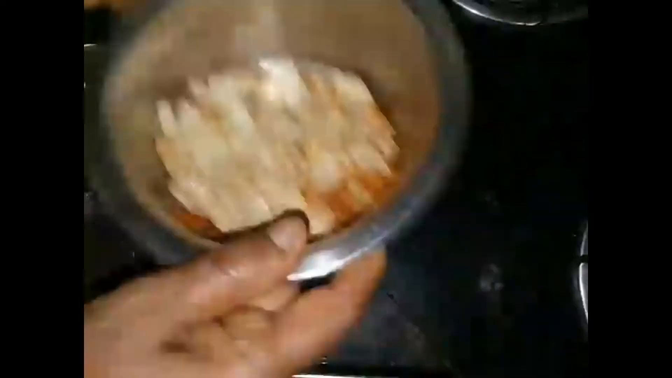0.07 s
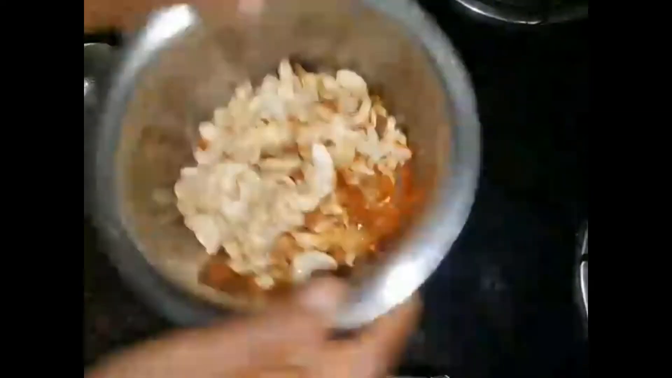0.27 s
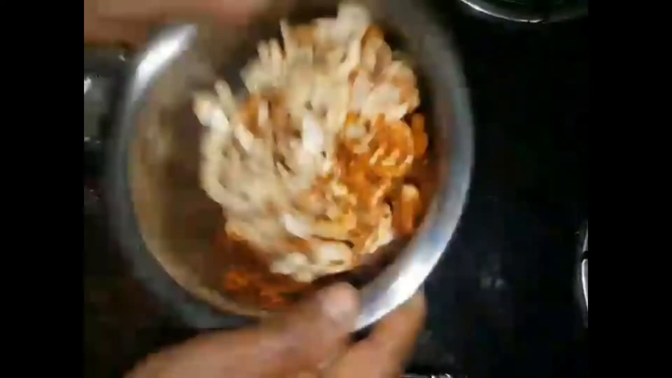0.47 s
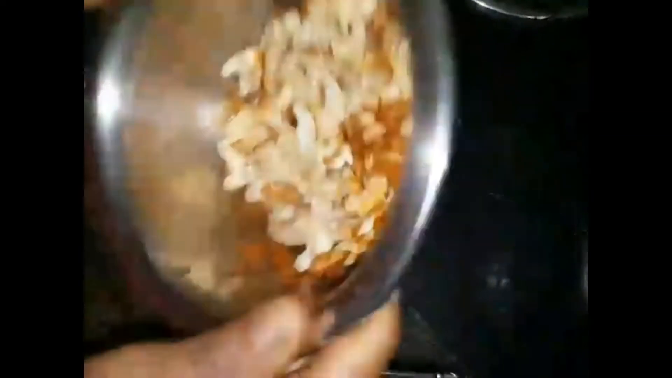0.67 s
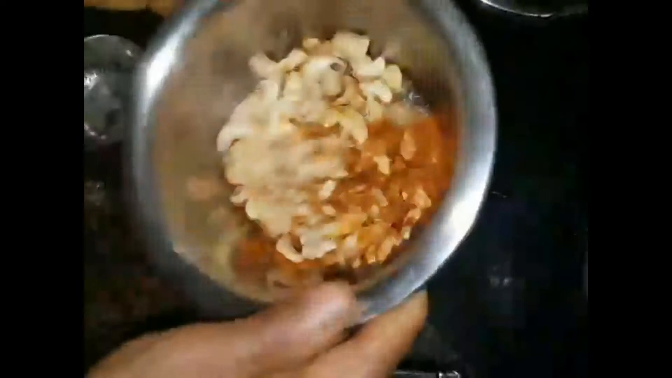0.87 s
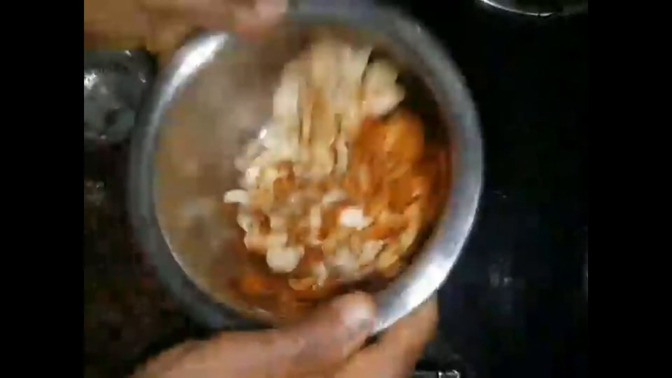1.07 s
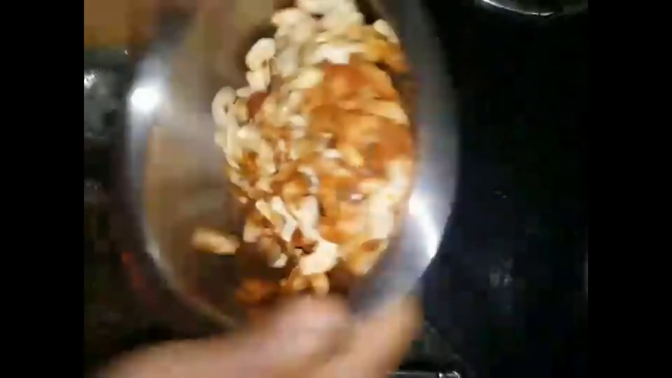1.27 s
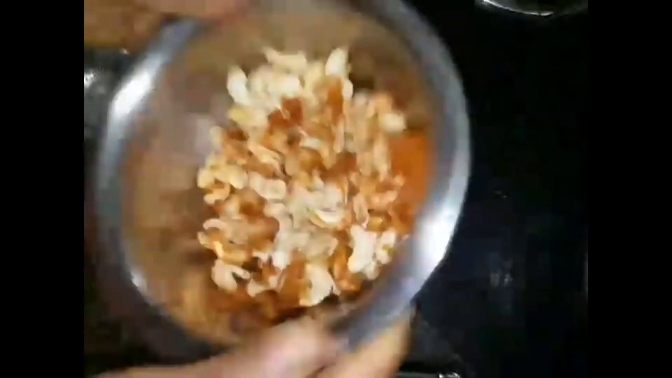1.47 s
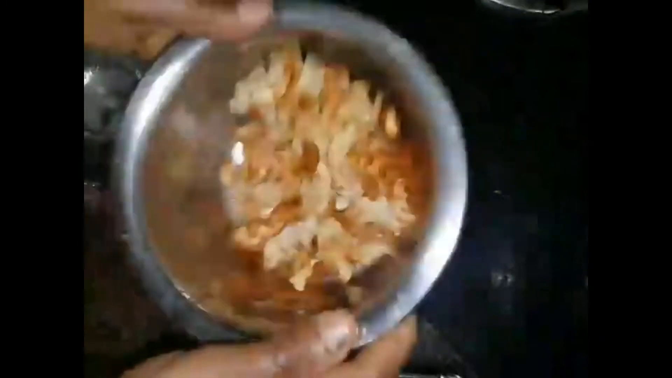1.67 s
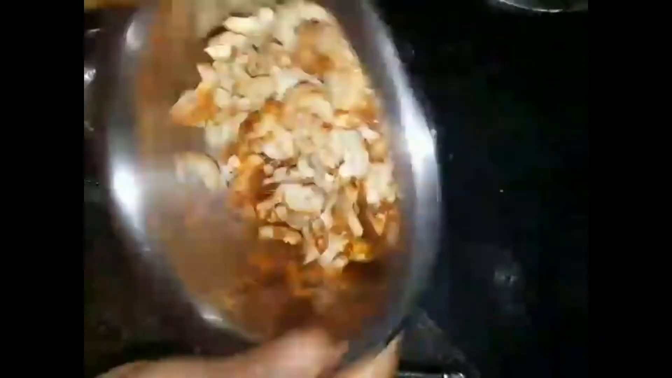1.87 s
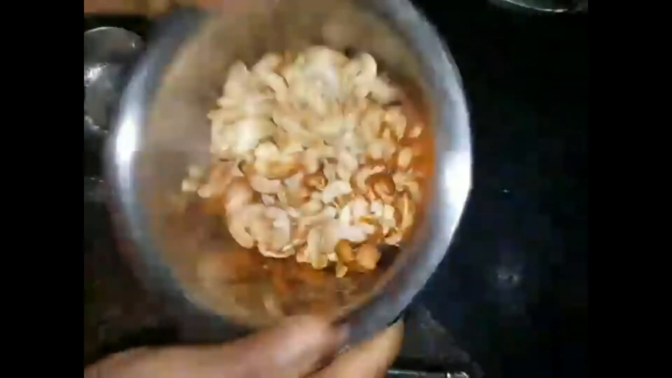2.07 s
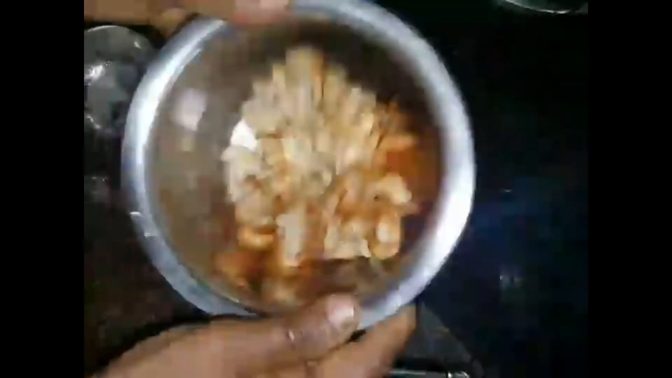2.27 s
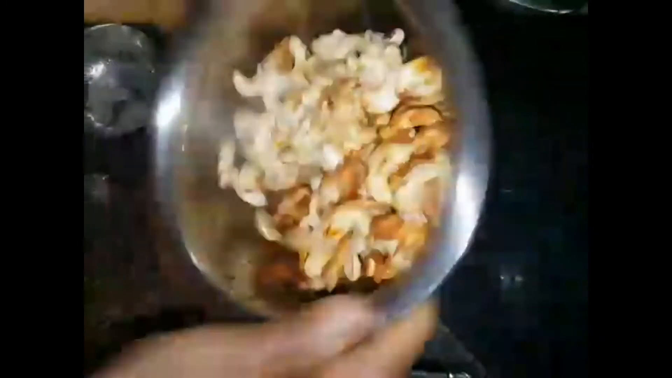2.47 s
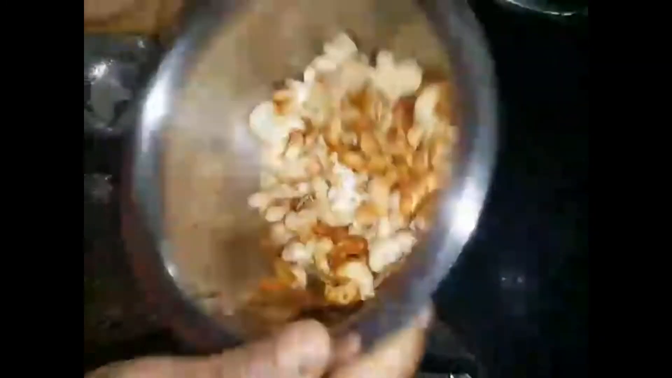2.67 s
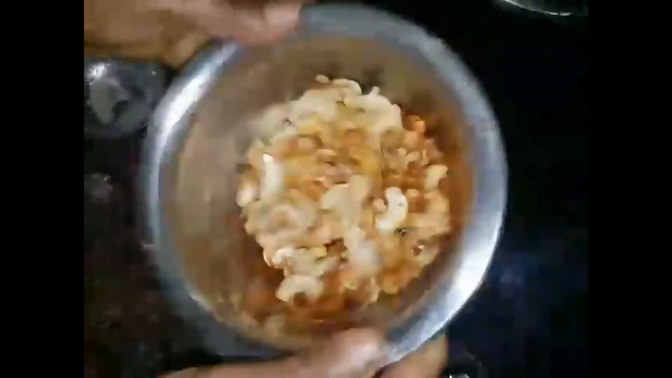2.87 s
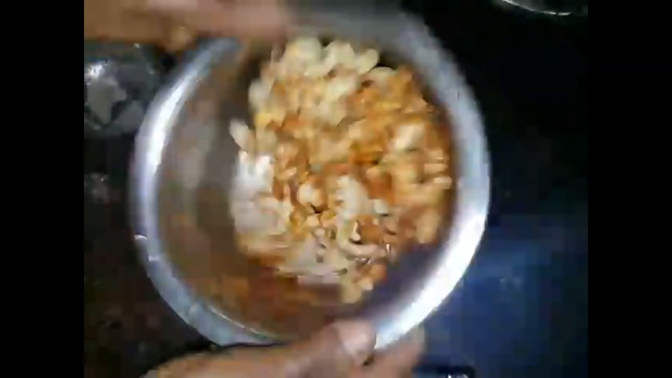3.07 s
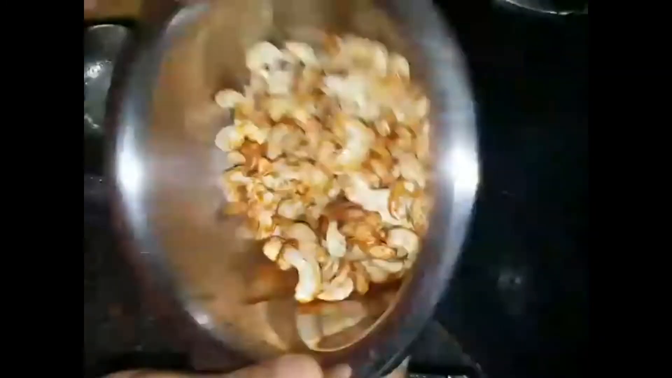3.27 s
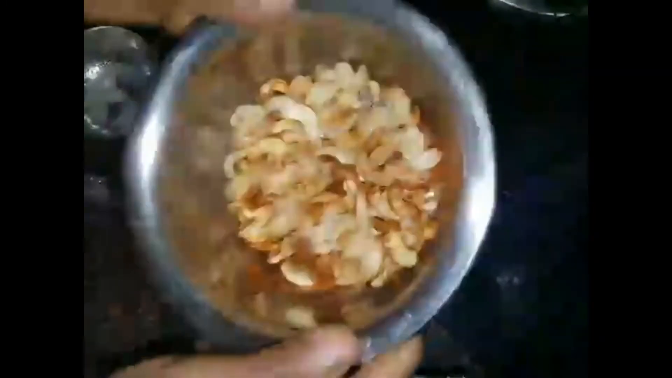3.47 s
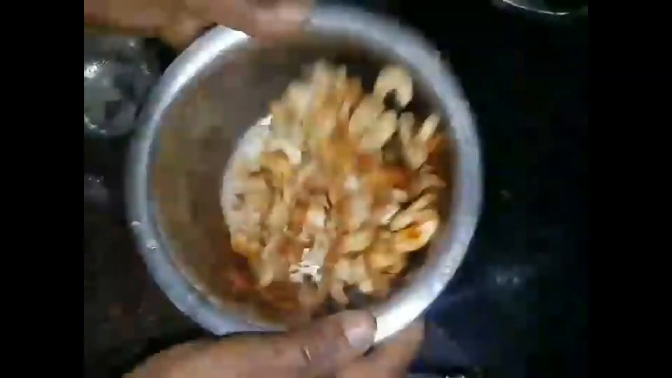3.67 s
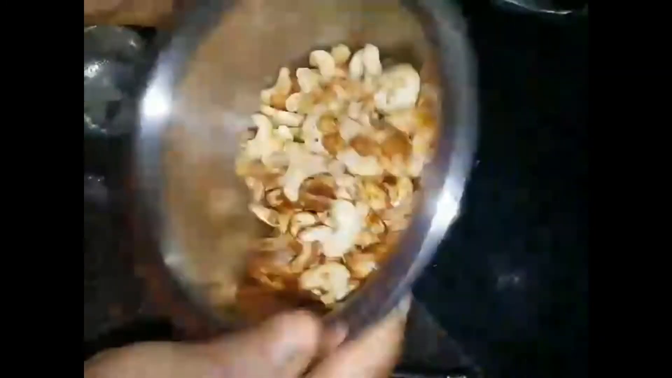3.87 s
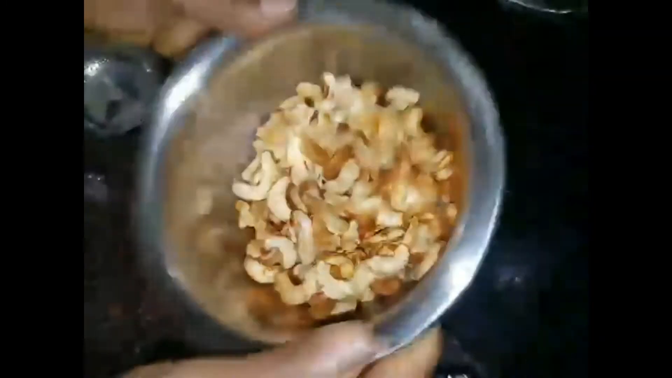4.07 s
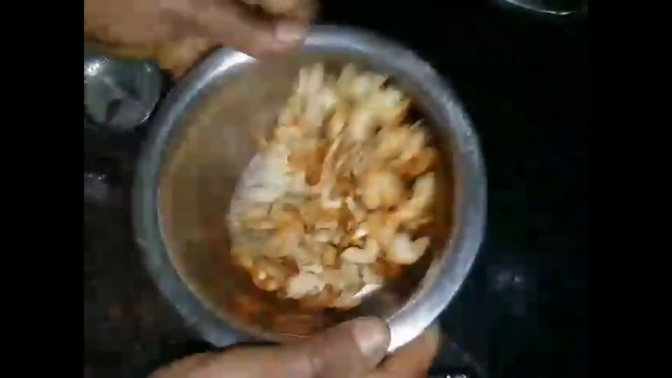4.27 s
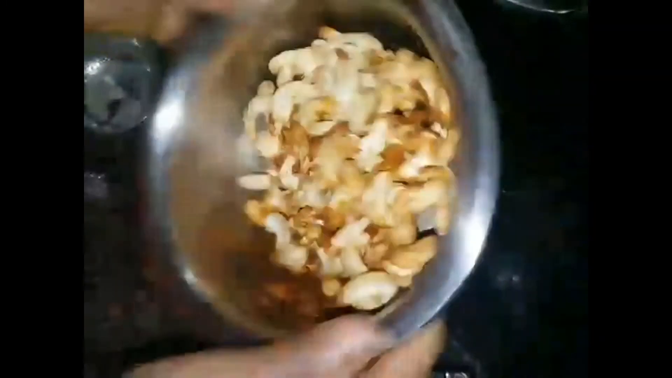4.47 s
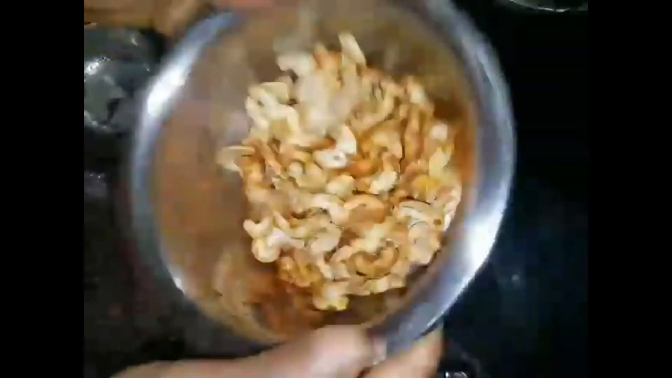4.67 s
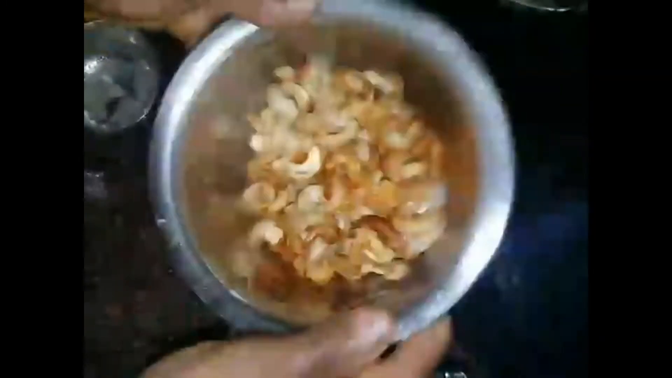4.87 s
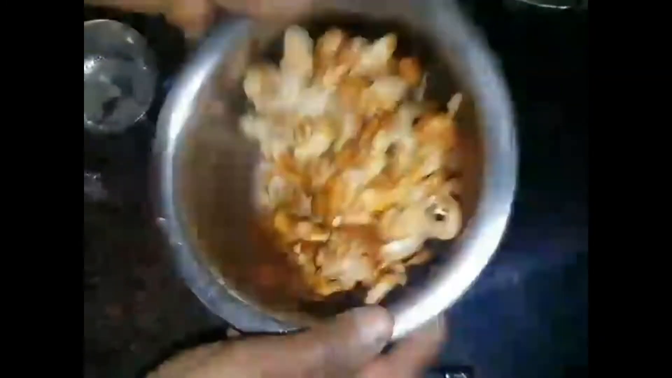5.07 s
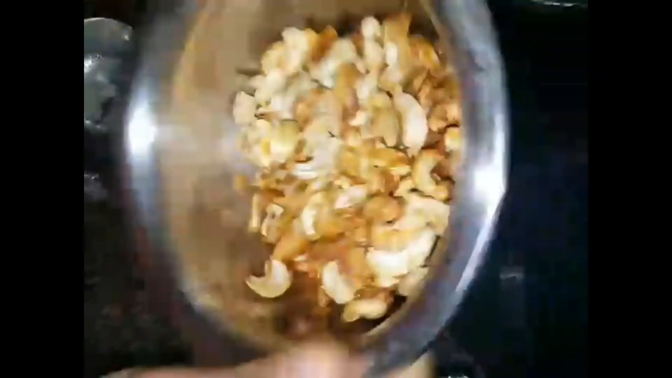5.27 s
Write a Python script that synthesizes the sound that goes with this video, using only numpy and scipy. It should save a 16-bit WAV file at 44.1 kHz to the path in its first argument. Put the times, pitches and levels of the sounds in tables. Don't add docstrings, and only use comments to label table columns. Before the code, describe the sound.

From 0 to 0.5 s the scene is quiet: soft room hush, a faint low fridge hum, light nut rustles near 0.1 and 0.2 s, and thin glass bangle clinks around 0.14 and 0.33 s. At about 0.51 s the first strong toss lands, and the nuts then fall every 0.27 to 0.31 s until the end, around 5.2 s. Each landing lasts under a tenth of a second: a dense shower of hard little blows, a hollow damped boom around 600 to 800 Hz, brighter wall raps around 2 kHz, dry nut-on-nut clicks and faint high crumb ticks, settling briefly. Strength varies slightly, with heavier hits near 1.37, 4.32, 4.87 and 5.16 s. Between landings bangles of two sizes chime and knock, very high and short, with small chatter. The sound is close, slightly left, loud peaks gently rounded, with a short kitchen tail and slightly smeared treble.

```python
import sys
import numpy as np
from scipy import signal
from scipy.fft import rfft, irfft, next_fast_len
from scipy.io import wavfile
from scipy.ndimage import uniform_filter1d, map_coordinates

SR = 44100
rng = np.random.default_rng(int(sys.argv[2]) if len(sys.argv) > 2 else 0)


def gain_from_decibels(decibels):
    exponent = np.asarray(decibels, float) / 20
    return 10 ** exponent


def put_to_file(sound):
    columns = np.atleast_2d(sound).T
    safe = np.clip(columns, -1, 1)
    whole_steps = np.round(safe * 32767)
    wavfile.write(sys.argv[1], SR, whole_steps.astype(np.int16))


N = 234303

# start in [s], peak of the heap on the bottom in [dB],
# nuts on the wall in [dB re heap], crumbs on the rim in [dB re heap], pour length in [s].
TOSS_EVENTS = [(-0.004, -30.5, -7.5, -17, .041), (0.097, -34, 3, -3, 0.038), (0.219, -37, -8.5, -8, 0.077),
               (.511, -9.5, -8, -20, 0.056), (0.792, -10, -12.5, -24, 0.072),
               (1.08, -10.5, -8.5, -21, 0.056), (1.365, -5.5, -11.5, -29, .064),
               (1.654, -8, -7, -20.5, 0.056), (1.966, -11.5, -7.5, -16.5, 0.078),
               (2.265, -7, -13, -23.5, 0.071), (2.539, -10.5, -6.5, -20, 0.068),
               (2.838, -7.5, -14, -27.5, 0.078), (3.132, -8, -13.5, -26.5, 0.083),
               (3.439, -6.5, -12, -20.5, 0.064), (3.716, -8, -10, -26.5, 0.066),
               (4.015, -10.5, -9.5, -23.5, 0.083), (4.308, -7, -11.5, -26.5, 0.068),
               (4.588, -7.5, -9, -25, 0.067), (4.871, -4.5, -13, -25.5, 0.074),
               (5.155, -7.5, -7, -24, 0.055)]


def unit(x):
    return x / np.sqrt(np.mean(x ** 2) + 1e-20)


def along(points, hz):
    f, v = np.transpose(points)
    return np.interp(np.log(hz + 1), np.log(f + 1), v)


def wobble(rate):
    knots = rng.standard_normal(int(N * rate / SR) + 4)
    return map_coordinates(knots, [np.arange(N) * rate / SR])


def filtered(x, response):
    m = next_fast_len(N + 8192)
    return irfft(rfft(x, m) * response(np.fft.rfftfreq(m, 1 / SR)), m)[..., :N]


def rings(modes, count, scatter_db, unlike, attack, detune):
    hz, db, t60 = np.transpose(modes)[:, :, None]
    t = np.arange(SR // 8) / SR
    luck = rng.standard_normal((count, 5, len(modes)))
    pitch = hz * (1 + detune * luck[:, 4, :, None])
    decay = gain_from_decibels(db - 60 * t / np.abs(t60))
    ring = decay * (1 - np.exp(-t / attack)) * np.exp(2j * np.pi * pitch * t)
    spot = gain_from_decibels(scatter_db * luck[:, :1]) * np.sign(luck[:, 1:2])
    share = spot * np.exp(unlike * (1j * luck[:, 2:4] + 0.18 * luck[:, 3:1:-1]))
    share /= np.sqrt(np.mean(np.abs(share) ** 2, 0))
    return np.imag(share @ ring)


def pours(rel_db, lag, rise, fall, settle_db, settle, slide_db):
    gain = np.full(N, gain_from_decibels(slide_db))
    for (s, db, _, _, pour), rel in zip(TOSS_EVENTS, rel_db):
        u = np.maximum(np.arange(N) / SR - s - lag, 0)
        swell = 1 - np.exp(-(u / rise) ** 2)
        falling = 1 / (1 + np.exp(np.minimum((u - pour) / fall, 50)))
        settling = gain_from_decibels(settle_db) * np.exp(-u / settle)
        gain += gain_from_decibels(db + rel) * swell * (falling + settling)
    return gain


def shower(gain, rate, spread_db, ring, singles, singles_db):
    count = len(ring)
    hits = rng.random((count, N)) < rate / SR / count
    blows = hits * gain_from_decibels(spread_db * np.minimum(rng.standard_normal((count, N)), 2))
    blows *= gain / np.sqrt(np.mean(blows ** 2) * np.sum(ring ** 2) / 2)
    for k, (s, peak_db) in enumerate(singles):
        spot = k % count
        blows[spot, round(s * SR)] += gain_from_decibels(peak_db + singles_db) / np.abs(ring[spot]).max()
    return signal.fftconvolve(blows[:, None], ring, axes=2).sum(0)[:, :N]


def bowl():
    # mode in [Hz], level in [dB], t60 in [s].
    bottom_modes = [(523, -17, .09), (581, -1.5, .09), (622, .5, .13), (655, -2, .06), (690, -4, .07),
                    (755, -6, .08), (796, -6, .09), (838, -4.5, .09), (900, -17, .06), (985, -22, .05)]
    wall_modes = [(1090, -11, .03), (1392, -8, .03), (1630, -11, .035), (1771, -9, .04), (2027, 0, .045),
                  (2113, 0, .045), (2304, -10, .035), (2728, -5, .05), (2960, -11, .04), (3590, -4.5, .045),
                  (4010, -14, .03)]
    rim_modes = [(4650, -8, .05), (5110, -8, .03), (5930, -6, .04), (6590, -2, .05), (6860, 0, .04),
                 (7120, -4, .05), (7530, -2, .04), (8180, -12, .02)]
    # time in [s], peak in [dB].
    heavy_landings = [(.137, -19), (.248, -24), (.508, -11.5), (.527, -6), (.542, 1), (.81, -6.5),
                      (.825, -2), (1.094, -6), (1.118, -9), (1.38, 0), (1.671, -6.5), (1.693, -2.5),
                      (1.973, -4), (1.997, -3.5), (2.024, -5.5), (2.273, -4.5), (2.286, -2), (2.556, -4),
                      (2.856, -3), (2.878, -1.5), (3.15, -21), (3.451, -16), (3.728, -3.5), (4.044, -3),
                      (4.321, 0.5), (4.597, -6.5), (4.625, 2), (4.887, -1), (5.168, 3), (5.205, -1)]
    # time in [s], peak in [dB].
    wall_raps = [(.5716, -7.5), (.829, -10), (1.089, -17), (1.1168, -30), (1.3764, -7.5), (1.4072, -33),
                 (1.6785, -6.5), (1.9706, -17), (1.9873, -20), (2.0218, -19), (2.0542, -18), (2.2926, -17),
                 (2.578, -5.5), (2.6139, -6), (2.8549, -33), (3.1726, -8.5), (3.4553, -20), (3.4861, -8),
                 (3.7478, -3.5), (3.7818, -9.5), (4.045, -17), (4.0626, -16), (4.321, -27), (4.345, -10),
                 (4.5989, -19.5), (4.6069, -34), (4.6408, -7.5), (4.8997, -37), (5.1656, -18),
                 (5.217, -3.5)]
    # time in [s], their gain in [dB].
    grip_curve = [
        (0, -2.5),
        (.55, 4),
        (1.1, -1.5),
        (1.7, 2.5),
        (2.1, -1.5),
        (2.7, -1.5),
        (3.7, -2.5),
        (4.3, -0.5),
        (4.7, -5.5),
    ]
    # frequency in [Hz], level in [dB].
    husk_colour = [(120, -40), (350, -6.5), (800, 6.5), (1600, 0.5), (3000, -5), (5000, -23), (8000, -19.5),
                   (13000, -37)]

    _, _, wall_db, crumb_db, _ = np.transpose(TOSS_EVENTS)
    heap = pours(0 * wall_db - 8, 0, rise=0.0045, fall=0.0013, settle_db=6, settle=0.062, slide_db=-47)
    wall = pours(wall_db - 10, 0.00062, rise=0.017, fall=0.012, settle_db=-8.5, settle=0.068, slide_db=-58.5)
    crumbs = pours(crumb_db - 5.5, 0.024, rise=0.0075, fall=0.01, settle_db=-15, settle=0.05, slide_db=-61.5)
    bottom_ring = rings(bottom_modes, count=6, scatter_db=3, unlike=0.16, attack=0.001, detune=0.003)
    wall_ring = rings(wall_modes, count=8, scatter_db=2.5, unlike=1.77, attack=0.0004, detune=0.011)
    rim_ring = rings(rim_modes, count=6, scatter_db=4, unlike=1.2, attack=0.0001, detune=0.008)

    boom = shower(heap, 550, 3.56, bottom_ring, heavy_landings, singles_db=3.5)
    boom = filtered(boom, lambda hz: (1j * hz / (480 + 1j * hz)) ** 6)
    grip = gain_from_decibels(np.interp(np.arange(N) / SR, *np.transpose(grip_curve)))
    boom = boom + (grip - 1) * filtered(boom, lambda hz: 1 / (1 + (hz / 670) ** 16))
    ring = shower(wall, 600, 6.7, wall_ring, wall_raps, singles_db=-5)
    sing = shower(crumbs, 1500, 7, rim_ring, [], singles_db=0)

    clicks = (rng.random(N) < 1100 / SR) * gain_from_decibels(6.4 * rng.standard_normal(N))
    puff_decay = gain_from_decibels(-60 * np.arange(400) / SR / 0.0089)
    grain = rng.standard_normal((2, N)) + 0.82 * rng.standard_normal(N)
    puffs = signal.fftconvolve(clicks, puff_decay)[:N] * grain
    clatter = gain_from_decibels(0.5) * wall * unit(filtered(puffs, lambda hz: gain_from_decibels(along(husk_colour, hz))))
    fizz = gain_from_decibels(-5) * crumbs * unit(filtered(puffs[::-1], lambda hz: hz ** 2 / (hz ** 2 + 7000 ** 2)))

    rumble = rng.standard_normal(N)
    thump = filtered(rumble, lambda hz: 0.18 / (1 + (hz / 30) ** 3) + 1 / (1 + (hz / 380) ** 4))
    boom = boom * gain_from_decibels([[1.5], [-1.6]]) + gain_from_decibels(-37.5) * heap * unit(thump)
    boom[1] = np.roll(boom[1], 6)
    return boom + (ring + clatter) * gain_from_decibels([[3.5], [-4]]) + (sing + fizz) * gain_from_decibels([[1.4], [-1.5]])


def hush():
    # frequency in [Hz], density in [dB per Hz].
    air_spectrum = [(13, -45), (22, -71), (44, -23), (140, -4), (387, -6.5), (618, -3), (1300, -13.5),
                    (3510, -19.5), (4380, -27), (8970, -24.5), (10600, -30.5), (14300, -20.5),
                    (16000, -14.5)]
    # frequency in [Hz], correlation in [0 to 1].
    ear_likeness = [(60, .8), (300, .95), (1400, .1), (15000, .03)]
    # frequency in [Hz], level in [dB].
    fridge_tones = [(82, -63), (134, -57), (291, -60)]

    z = signal.stft(rng.standard_normal((2, N)), nperseg=512)[2]
    patches = uniform_filter1d(rng.standard_normal(z.shape[1:]), size=10, axis=0)
    patches = uniform_filter1d(patches, size=8, axis=1)
    drift_db = np.linspace(1.2, 4, len(patches))[:, None] * unit(patches)
    air = signal.istft(z * gain_from_decibels(drift_db), nperseg=512)[1][:, :N]

    def mid_side(hz):
        turn = np.arccos(np.clip(along(ear_likeness, hz), -1, 1)) / 2
        return gain_from_decibels(along(air_spectrum, hz)) * [np.cos(turn), np.sin(turn)]

    mid, side = filtered(air, mid_side)
    hum = np.zeros(N)
    for hz, db in fridge_tones:
        level = gain_from_decibels(db + 4.7 * wobble(8.1))
        hum += level * np.sin(2 * np.pi * hz * np.arange(N) / SR + 2.1 * wobble(10))
    return gain_from_decibels(-42.5) * unit(np.array([mid + side, mid - side])) + hum


def clinks():
    # time in [s], peak in [dB],
    # low modes in [dB re peak], high modes in [dB re peak].
    thin_chimes = [(0.3316, -12, -9, -14.5), (0.4688, -29, 1.5, -2), (0.4816, -24, -7, -9),
                   (.919, -36, -1, -10), (0.982, -19, -16, -18), (0.9973, -18, -7.5, -10),
                   (1.3306, -21, -14, -9.5), (1.4438, -20, -10, -10), (1.7993, -31.5, -4.5, -11),
                   (1.8315, -19.5, -9, -11), (2.125, -29.5, -14, -8), (2.421, -31, -12, -14),
                   (2.439, -21.5, -15, -11), (2.6934, -15, -11.5, -10), (3.009, -15, -12.5, -15),
                   (3.026, -30, -1.5, -5), (3.059, -37, -3, -26), (3.2833, -26, -2.5, -6),
                   (3.3258, -15.5, -10, -13.5), (3.587, -27, -2, -15), (3.621, -22, -7, -10),
                   (3.8213, -31, -7.5, -7), (3.871, -12, -19, -16), (4.1791, -30, -1.5, -7),
                   (4.2254, -25, -7, -7), (4.4606, -22, -3, -5), (4.486, -23, -5, -12),
                   (4.6982, -24.5, -16, -12.5), (4.7636, -18, -17, -13), (5.263, -15, -13, -16)]
    # time in [s], peak in [dB],
    # thin bangle in [dB re peak], wide bangle in [dB re peak].
    wide_knocks = [(0.0942, -21.5, -26.5, -18), (0.1377, -15, -10.5, -8.5), (0.6428, -21, -7, -10),
                   (0.781, -23, -29, -29), (.957, -21.5, -10, -10), (1.2322, -18.5, -2.5, -12),
                   (1.4851, -14.5, -12.5, -17), (1.6509, -14, -17, -18), (1.897, -14, -10.5, -14),
                   (2.2188, -23, -34, -5.5), (2.5144, -15.5, -17, -17), (2.816, -15.5, -19, -16),
                   (2.85, -19.5, -20, -21), (3.113, -22, -11, -6.5), (3.3889, -17.5, -16.5, -10.5),
                   (3.6337, -20, -13, -32), (3.704, -15.5, -24, -5.5), (3.8982, -19, -7.5, -22),
                   (3.9644, -22.5, -10, -1.5), (4.5275, -15.5, -16, -32), (4.57, -25, -12, -7.5),
                   (4.7832, -24, -7, -7), (4.8358, -23, -26, -35), (4.981, -26, -3, -22),
                   (5.0888, -25.5, -17, 0)]

    chimes = [(s, db, low, high, -30, 2) for s, db, low, high in thin_chimes]
    knocks = [(s, db, thin, thin - 8.5, wide, 6) for s, db, thin, wide in wide_knocks]
    jolts = [(s + 0.017 + 0.044 * late, db - 21.5, -14, -9, -11, -10.5)
             for (s, db, *_), late in zip(TOSS_EVENTS, rng.random(len(TOSS_EVENTS)))]
    return chimes + knocks + jolts


def bangles():
    # mode in [Hz], level in [dB], t60 in [s].
    thin_low_modes = [(4740, -28.5, 0.36), (7830, -19.5, 0.05), (8530, 3, 0.013), (8937, 6, 0.043),
                      (8860, -15.5, 0.15), (9200, -28, 0.063)]
    thin_high_modes = [(12830, -4.5, 0.073), (13100, -1, 0.045), (14100, 2, 0.025), (14520, 6.5, 0.065),
                       (16100, -14, 0.036)]
    wide_modes = [(3500, -8, .045), (5210, -12, .045), (7285, 0, .06), (9560, -10, .04), (11810, -14, .05)]

    out = np.zeros((2, N + SR))
    contacts = clinks()
    count = len(contacts)
    low = rings(thin_low_modes, count, scatter_db=2, unlike=1.4, attack=0.0002, detune=0.006)
    high = rings(thin_high_modes, count, scatter_db=2, unlike=1.4, attack=0.0003, detune=0.004)
    wide = rings(wide_modes, count, scatter_db=2.5, unlike=1.2, attack=0.0002, detune=0.004)
    t = np.arange(low.shape[2]) / SR
    crack_decay = gain_from_decibels(-7.5 - 60 * t / 0.0017) + gain_from_decibels(-20.5 - 60 * t / 0.046)
    for k, (s, db, low_db, high_db, wide_db, pan_db) in enumerate(contacts):
        crack = crack_decay * np.diff(rng.standard_normal((2, len(t) + 1)))
        rub = 1 + 0.56 * unit(uniform_filter1d(rng.standard_normal(len(t)), size=90))
        clink = gain_from_decibels(low_db - 3) * low[k] + gain_from_decibels(high_db - 4) * high[k] + gain_from_decibels(wide_db - 3) * wide[k]
        clink = clink * rub + crack
        bounces = (rng.random(2048) < 160 / SR) * rng.standard_normal(2048)
        chatter = bounces * gain_from_decibels(-4 - 60 * t[:2048] / 0.09)
        chatter[0] = 1
        clink = signal.fftconvolve(clink, chatter[None], axes=1)
        pan = np.array([[pan_db], [-pan_db]]) / 2
        out[:, round(s * SR):][:, :clink.shape[1]] += gain_from_decibels(db + pan) * clink
    return out[:, :N]


def kitchen(x):
    # frequency in [Hz], t60 in [s].
    room_decay = [(200, 0.21), (2000, 0.34), (10000, 0.32)]
    hz, t, z = signal.stft(rng.standard_normal((2, SR // 2)), SR, nperseg=256)
    tail = signal.istft(z * gain_from_decibels(-60 * t / along(room_decay, hz)[:, None]), SR, nperseg=256)[1]
    tail[1] = 0.7 * tail[0] + 0.7 * tail[1]
    delayed = np.pad(x, ((0, 0), (200, 0)))
    return signal.fftconvolve(delayed, tail / np.linalg.norm(tail[0]), axes=1)[:, :N]


def scene():
    near = bowl() + bangles()
    left, right = near + gain_from_decibels(-8.5) * kitchen(near)
    air = hush()
    return np.array([left + air[0], np.roll(right, 1) + np.roll(air[1], 7)])


def thin_treble(x):
    hz, _, z = signal.stft(x, SR, nperseg=1024)
    hz = hz[:, None]
    band = uniform_filter1d(np.abs(z) ** 2, size=16, axis=1)[:, 8::16].repeat(16, 1)
    band = np.concatenate([band, band[:, -1:]], 1)
    loudest = band[:, hz[:, 0] > 6000].max((0, 1))
    treble = hz > 3800
    whim = unit(uniform_filter1d(rng.standard_normal((65, len(loudest))), size=4, axis=1))
    whim = gain_from_decibels(15 * whim).repeat(8, 0)[:len(hz)]
    masker = loudest + 0.3 * np.roll(loudest, -1)
    masked = treble & (band.mean(0) < gain_from_decibels(-49) * whim * (hz / 9000) ** 2 * masker)
    blur = gain_from_decibels(-12) * treble * np.sqrt(band) * np.exp(2j * np.pi * rng.random(z.shape))
    top_hz = np.where(loudest > 25 * np.roll(loudest, 1), 16250, 15350)
    edge = 1 / (1 + (hz / top_hz) ** 150)
    kept = (z + blur) * edge * np.where(masked, gain_from_decibels(-46), 1)
    return signal.istft(kept, SR, nperseg=1024)[1][:, :N]


def band_limit(x):
    return signal.sosfilt(signal.butter(12, 16470, fs=SR, output="sos"), x)


def record(dry):
    rounded = dry / (1 + np.abs(dry / 1.05) ** 4) ** 0.25
    mix = thin_treble(rounded)
    return band_limit(mix)


dry = scene()
out = record(dry)
put_to_file(out)
```